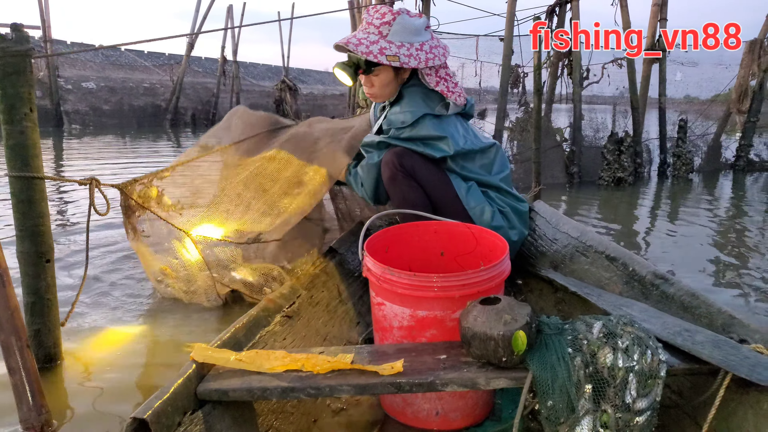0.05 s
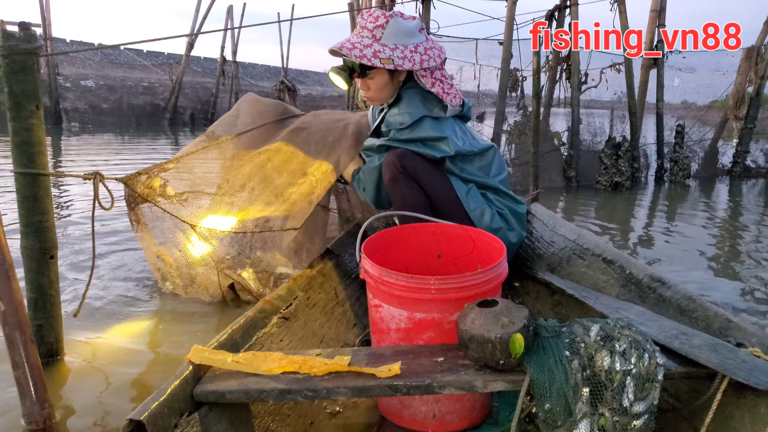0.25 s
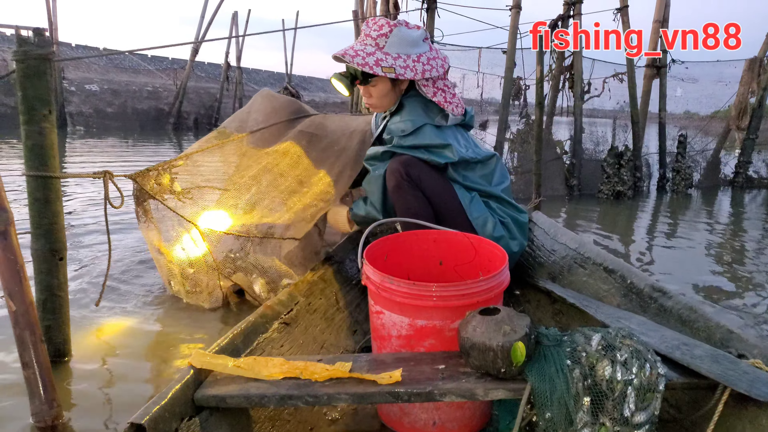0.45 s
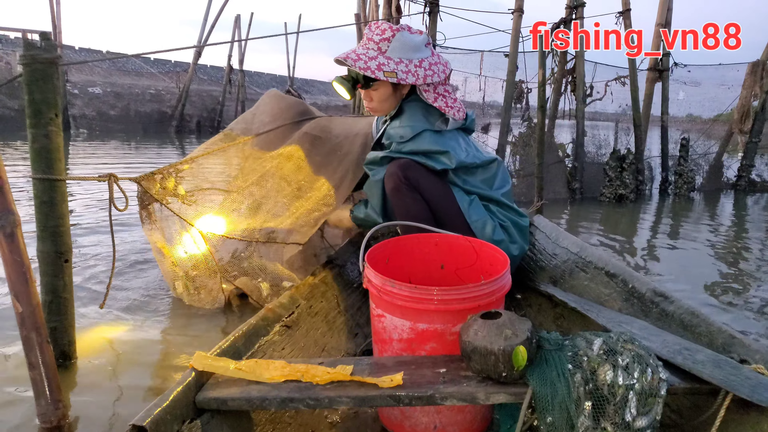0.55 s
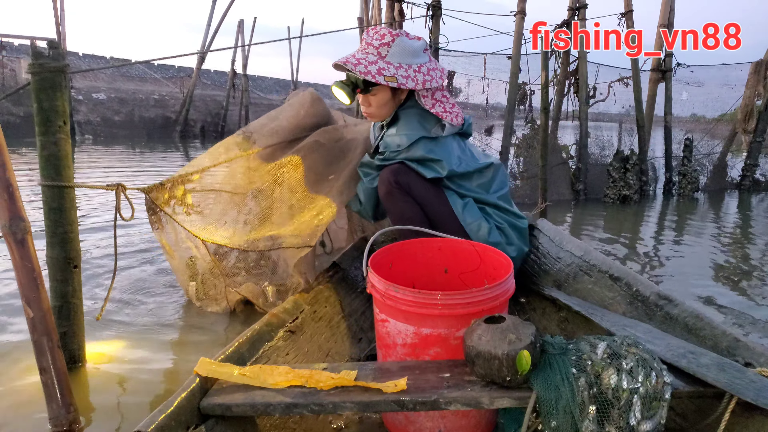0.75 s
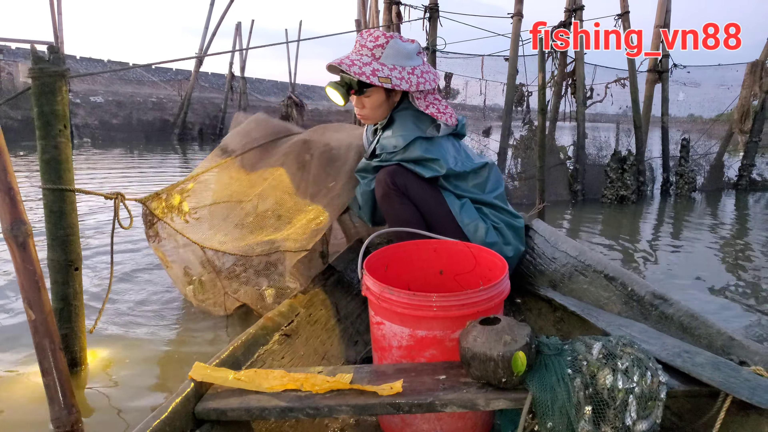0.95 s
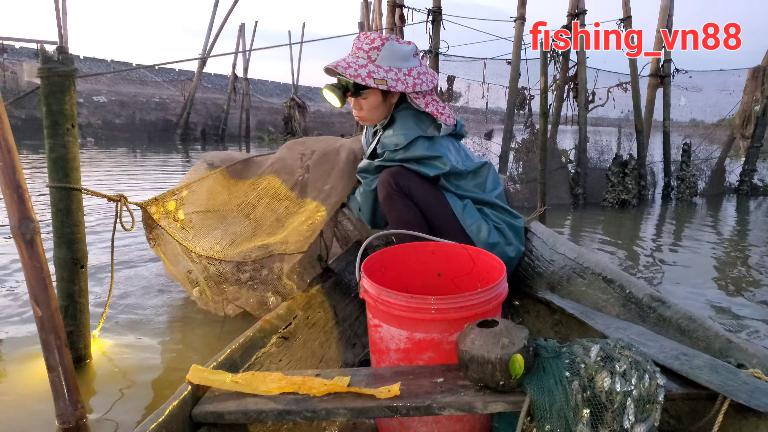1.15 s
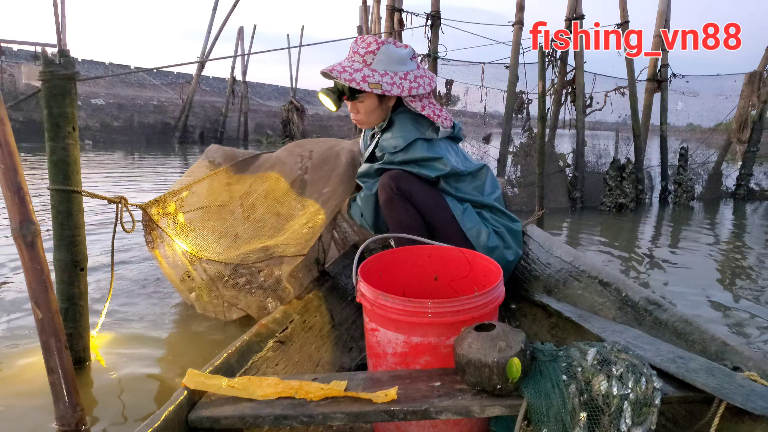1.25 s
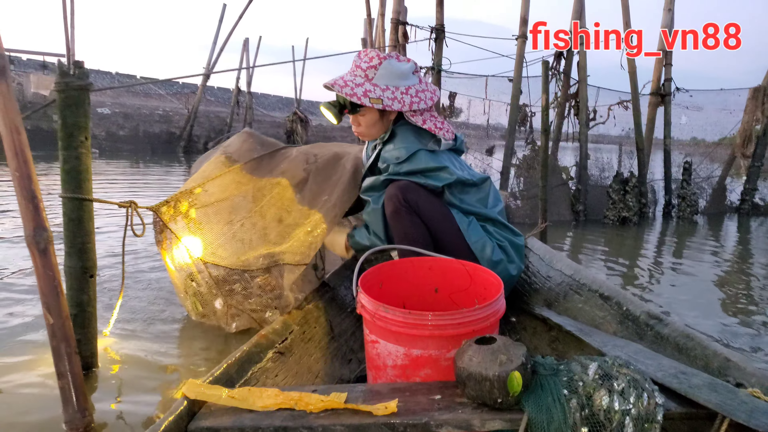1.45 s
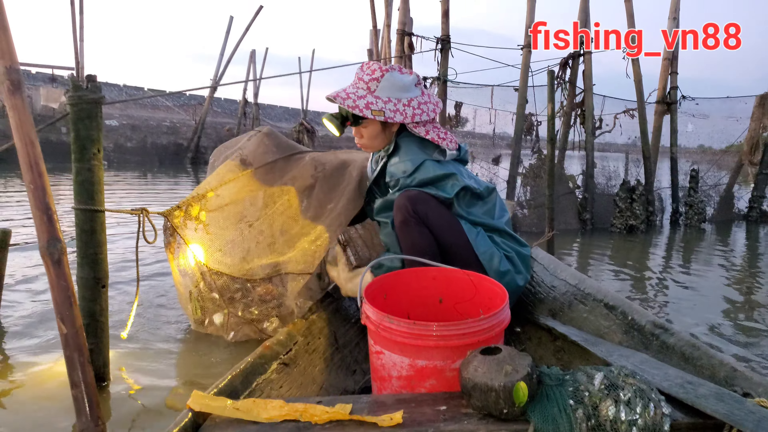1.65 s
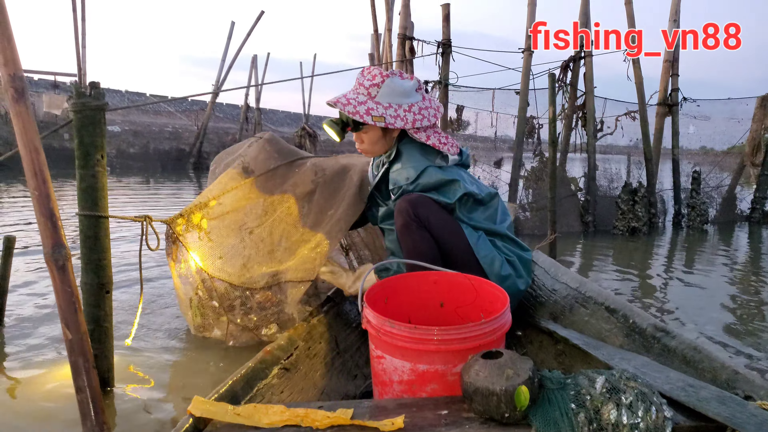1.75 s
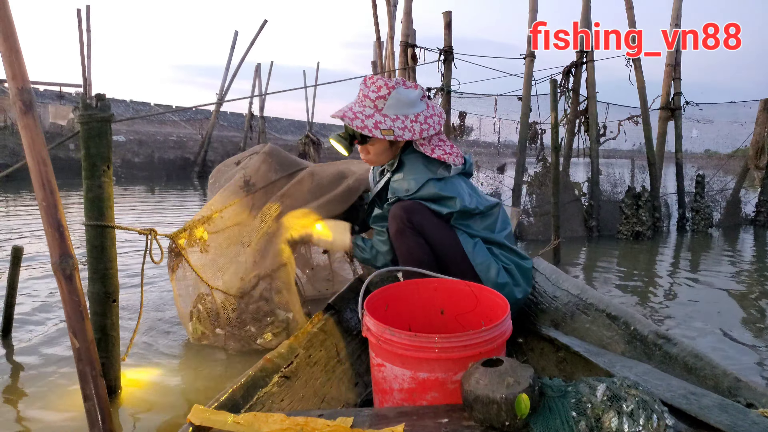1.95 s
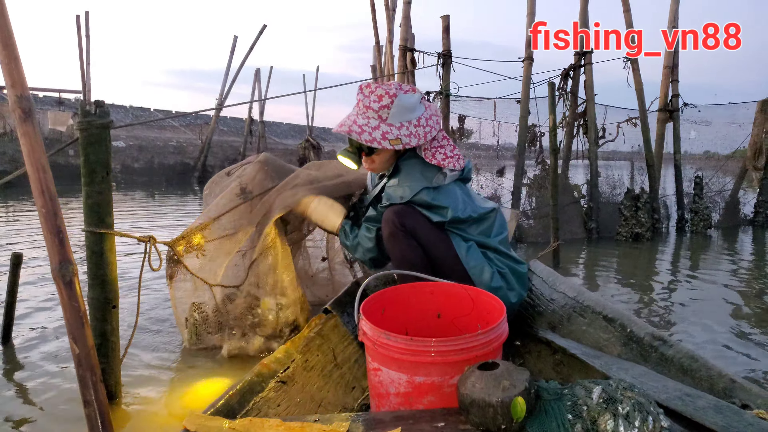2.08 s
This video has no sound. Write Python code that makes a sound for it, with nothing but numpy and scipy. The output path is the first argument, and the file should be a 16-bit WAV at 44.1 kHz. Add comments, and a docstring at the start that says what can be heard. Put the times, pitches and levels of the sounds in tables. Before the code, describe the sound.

Gushes of fine droplets drain off a hand-gathered net into a river, then two sharp slaps of water, with a low engine far behind.

```python
"""Water trickles and sprays from the mesh of a wet net, over the rumble of a far engine and the wash of a river.
The net is gathered by hand at the side of a wooden boat, and every pull wrings out a gush of tiny ringing drops.
Single drops patter down as noise bursts with a ring; trapped air rings as gliding sines.
Twice the water splashes up loudly: slaps of coloured noise with a cavity resonance, spray and falling droplets."""
import sys
import numpy as np
from scipy import signal
from scipy.fft import rfft, irfft
from scipy.io import wavfile

SR = 44100
rng = np.random.default_rng(int(sys.argv[2]) if len(sys.argv) > 2 else 0)


def master(y):
    """Save y as 16-bit WAV."""
    cut = np.clip(np.atleast_2d(y).T, -1, 1)
    pcm = np.round(cut * 32767)  # scale
    wavfile.write(sys.argv[1], SR, pcm.astype(np.int16))


N = 295029
TIME = np.arange(N) / SR  # s
FREQS = np.maximum(np.fft.rfftfreq(N, 1 / SR), 1)  # Hz


def from_db(db):
    """Amplitude ratio: 20 dB is a factor of ten in pressure."""
    return 10 ** (np.asarray(db) / 20)


def rms_one(x):
    """Power normalisation: scale to unit rms."""
    return x / np.sqrt(np.mean(x ** 2) + 1e-20)


def at_hz(points, hz):
    """Logarithmic pitch scale: interpolate a table between its frequencies."""
    table_hz, value = np.transpose(points)
    return np.interp(np.log(hz), np.log(table_hz), value)


def drift(rate_hz):
    """Low-passed chance: a slow random curve of unit rms."""
    knots = rng.standard_normal(int(N / SR * 400))
    low_pass = signal.butter(2, min(rate_hz, 90), fs=200, output="sos")
    slow = signal.sosfilt(low_pass, knots)[len(knots) // 2:]  # the settled half, 200 knots per second
    return np.interp(TIME, np.linspace(0, N / SR, len(slow)), rms_one(slow))


def noise(spectrum):
    """Spectral shaping: white noise weighted to a given colour, rms 1."""
    white = rfft(rng.standard_normal(N))
    return rms_one(irfft(white * from_db(at_hz(spectrum, FREQS)), N))


def resonate(x, hz, q):
    """Damped resonance: two poles whose radius sets the bandwidth hz / q, near unit gain on top."""
    radius = np.exp(-np.pi * hz / q / SR)
    zeros = np.array([1, 0, -1]) * (1 - radius * radius) / 2
    poles = [1, -2 * radius * np.cos(2 * np.pi * hz / SR), radius * radius]
    return signal.lfilter(zeros, poles, x + 1e-18)


def high_pass(x, hz):
    """High-pass filtering: second-order removal of what lies below a corner."""
    return signal.sosfilt(signal.butter(2, hz, "high", fs=SR, output="sos"), x)


def add(out, start_s, sound):
    """Superposition: mix a short sound in at a time."""
    i = int(np.clip(start_s * SR, 0, N - 1))
    out[i:i + len(sound)] += sound[:N - i]


def burst(t, swell_s, decay_s):
    """Attack and exponential decay: an envelope that climbs to 1 and dies away."""
    return np.minimum(t / swell_s, 1) * np.exp(-np.maximum(t - swell_s, 0) / decay_s)


def rush(shape):
    """Whitening: a noise burst under an envelope, evened over all frequencies; rms 1."""
    spectrum = rfft(rng.standard_normal(len(shape)) * shape)
    flat = irfft(spectrum / (np.abs(spectrum) + 1e-12), len(shape))
    return rms_one(flat * np.sqrt(shape))


def colour(spectrum):
    """Minimum phase: a causal response of given levels rings only after what excites it."""
    cepstrum = irfft(np.log(from_db(at_hz(spectrum, FREQS))), N)
    cepstrum[1:N // 2 + 1] *= 2  # fold negative time onto positive
    cepstrum[N // 2 + 1:] = 0
    return np.exp(rfft(cepstrum))


# each pull on the net wrings out a gush of water
# columns: crest_s, swell_s, ebb_s, trickle_db, fizz_db, spray_db
GUSHES = [(0.13, 0.34, 0.28, -53.5, -56, -58.5), (0.96, 0.35, 0.32, -57.5, -61, -59.5),
          (1.4, 0.21, 0.31, -62.5, -63.5, -61.5), (2.52, 0.26, 0.21, -54, -55.5, -62.5),
          (3.1, 0.3, 0.12, -58, -54.5, -59), (4.0, 0.21, 0.15, -50.5, -53, -58),
          (5.029, 0.121, 0.22, -55.5, -60, -65), (5.52, 0.066, 0.1, -44.5, -53, -52),
          (5.92, 0.16, 0.24, -56, -61.5, -61.5), (6.583, 0.21, 0.11, -49, -57, -59)]
# the mesh keeps draining between pulls: trickle_db, fizz_db, spray_db
SEEP_LEVELS_DB = (-60.5, -68.5, -69)


def flow():
    """Addition of powers: a steady seep plus a gush for each pull, as dB of trickle, fizz and spray."""
    power = from_db(SEEP_LEVELS_DB)[:, None] ** 2
    for crest_s, swell_s, ebb_s, *levels_db in GUSHES:
        width_s = np.where(TIME < crest_s, swell_s, ebb_s)
        gush = np.exp(-((TIME - crest_s) / width_s) ** 2)
        power = power + np.outer(from_db(levels_db), gush) ** 2
    return 10 * np.log10(power)


# colour of the running water within each register
# columns: pitch_hz, level_db (relative, per Hz)
TRICKLE_COLOUR = [(300, -22), (450, -32), (620, 9), (780, 3.5), (1050, 8.5), (1270, 3.5), (1480, -0.5),
                  (1750, 8), (2100, -15.5), (2500, -3.5), (3000, -5), (5000, -16), (7000, -14),
                  (10000, -24.5), (15000, -10.5)]


def trickle(per_s=420, size_db=4.0, q=6.9, clump_db=2.5, own_db=3.0, smooth_hz=2000, count=36):
    """Random impulses on resonators: countless drops ring a few cycles, the high ones most numerous."""
    clumps, registers = drift(20.7), np.zeros((3, N))
    for hz in np.geomspace(380, 15500, count):
        born = rng.random(N) < per_s * (hz / 1000) ** .75 / SR  # per_s holds at 1 kHz
        sizes = np.zeros(N)
        drop_db = size_db * np.minimum(rng.exponential(1, born.sum()), 4)
        sizes[born] = from_db(drop_db) * rng.choice([-1, 1], born.sum())
        patchy_db = own_db * min(1, smooth_hz / hz)  # the fine spray is the most even
        patches = from_db(clump_db * clumps + patchy_db * drift(4.9))
        rings = rms_one(resonate(sizes * patches, hz, q))
        # trickle, fizz and spray part at 2000 and 6500 Hz; sqrt(hz) allows for the widening bands
        register = np.searchsorted([2000, 6500], hz)
        registers[register] += rings * np.sqrt(hz) * from_db(at_hz(TRICKLE_COLOUR, hz))
    return sum(rms_one(r) * from_db(level_db) for r, level_db in zip(registers, flow()))


# colour of the engine's rumble
# columns: pitch_hz, level_db (relative, per Hz)
RUMBLE_COLOUR = [(20, -23), (32, -23), (45, -4), (66, -2), (90, -1), (120, -6), (160, -10), (215, -17),
                 (290, -15), (420, -29.5), (700, -38), (1500, -65)]
# engine orders
# columns: pitch_hz, level_db (rms, before the throb)
ENGINE_ORDERS = [(66, -56), (127.5, -63), (186, -64)]


def engine(rumble_db=-49.5, side_db=-16, waver_rad=0.86, throb_db=2.0):
    """Periodic orders in broadband noise: a distant engine's dull rumble, nearly alike left and right."""
    side = from_db(side_db) * noise(RUMBLE_COLOUR) * np.array([[1], [-1]])
    rumble = noise(RUMBLE_COLOUR) + side
    hum = np.zeros(N)
    for hz, level_db in ENGINE_ORDERS:
        level = from_db(level_db + throb_db * drift(5.3))
        phase = 2 * np.pi * hz * TIME + waver_rad * drift(2.6)
        hum += level * np.sqrt(2) * np.sin(phase)
    return from_db(rumble_db) * rumble + hum


# colour of the open water
# columns: pitch_hz, level_db (relative, per Hz)
RIVER_COLOUR = [(150, 2.5), (320, 13.5), (480, 2.5), (950, 6.5), (1400, -0.5), (1800, -2), (3000, -4),
                (6000, -11.5), (10000, -28), (15000, -34)]


def river(level_db=-61):
    """Incoherent field: independent noise left and right makes the soft, wide wash of open water."""
    return from_db(level_db) * np.array([noise(RIVER_COLOUR), noise(RIVER_COLOUR)])


SMALL_DROPS_PER_S = 22  # at the mean fizz level
SMALL_DROP_DB, SMALL_SMACK_DB, SMALL_SPATTER_DB = -60.5, -67, -65  # likewise
SMALL_DROP_HZ, SMALL_DROP_OCTAVES, SMALL_DROP_SPREAD_DB = 2960, 0.6, 2.5  # median, spreads
DROP_SIZE_FOLLOWS = 0.54  # share of the flow's swing in dB


def small_drops():
    """Flow-driven Poisson process: lesser drops, more and heavier in a gush; rows as in LARGE_DROPS."""
    swing_db = flow()[1]
    swing_db = swing_db - swing_db.mean()
    born = np.flatnonzero(rng.random(N) < SMALL_DROPS_PER_S * from_db(swing_db) / SR)
    pitch, size, spatter = rng.standard_normal((N, 3))[born].T
    weight_db = DROP_SIZE_FOLLOWS * swing_db[born] + SMALL_DROP_SPREAD_DB * size
    hz = np.clip(SMALL_DROP_HZ * 2 ** (SMALL_DROP_OCTAVES * pitch), 900, 7000)
    spatter_db = SMALL_SPATTER_DB + weight_db + SMALL_DROP_SPREAD_DB * spatter
    return list(zip(born / SR, hz, SMALL_DROP_DB + weight_db, SMALL_SMACK_DB + weight_db, spatter_db))


# the largest drops; levels are rms at the crest of the envelope
# columns: start_s, pitch_hz, ring_db, smack_db, spatter_db
LARGE_DROPS = [(.05, 4360, -44, -48, -55), (.054, 1620, -44, -52, -60), (.083, 2260, -49, -46, -58),
               (.089, 2780, -46, -48, -60), (0.107, 2910, -48, -51, -60), (.128, 1740, -54, -65, -60),
               (.185, 4710, -47, -43, -56), (0.1995, 4300, -38, -36.5, -51), (.209, 4150, -40, -50, -60),
               (.227, 2470, -48, -56, -62), (.272, 2390, -48, -41, -60), (0.282, 4100, -42, -42, -53),
               (.298, 1230, -50, -60, -46), (.304, 3660, -46, -57, -64), (0.388, 4050, -44, -63, -66),
               (.563, 4260, -52, -57, -38.5), (0.604, 4000, -65, -72, -57), (.626, 3970, -60, -61, -44.5),
               (.727, 2590, -41, -55, -62), (.755, 2140, -45, -51, -64), (.783, 4000, -44, -48, -62),
               (.837, 3640, -44.5, -58, -64), (.858, 3690, -53, -59, -64), (.873, 1740, -56, -69, -66),
               (.925, 1610, -42.5, -54, -62), (.933, 2170, -49, -62, -62), (.969, 1730, -45, -64, -64),
               (.975, 2160, -45, -60, -64), (0.996, 1230, -38.5, -43.5, -58), (1.018, 1970, -42, -48, -54),
               (1.054, 4670, -49, -56, -45), (1.088, 1680, -43, -59, -62), (1.125, 1990, -41, -54, -60),
               (1.457, 4860, -47, -46, -55), (1.492, 5120, -59, -43.5, -59), (1.502, 3080, -44, -46, -57),
               (1.739, 2420, -42.5, -53, -66), (1.743, 3924, -38.5, -71, -67),
               (1.946, 1970, -37.5, -50, -52), (1.952, 2390, -46, -54, -48), (2.001, 1450, -50, -66, -40.5),
               (2.157, 3030, -38.5, -53, -56), (2.164, 1790, -44, -59, -62), (2.213, 1844, -32, -58, -60),
               (2.23, 3120, -38, -58, -60), (2.31, 1930, -44, -48, -62), (2.336, 3590, -43, -38.5, -49),
               (2.343, 3590, -48, -44, -46), (2.36, 1725, -45, -61, -62), (2.386, 1650, -36, -60, -52),
               (2.398, 3280, -37, -44, -58), (2.404, 4110, -35, -36.5, -52), (2.434, 2754, -52, -45, -39),
               (2.449, 2510, -43, -43.5, -57), (2.481, 1940, -43, -59, -62), (2.507, 3010, -55, -42.5, -50),
               (2.558, 1320, -36, -54, -62), (2.569, 2170, -37, -61, -64), (2.586, 1930, -38, -62, -62),
               (2.63, 2670, -58, -72, -66), (2.671, 3650, -42, -41, -39), (2.679, 2460, -35, -41, -41),
               (2.71, 2520, -37, -47, -64), (2.722, 2970, -48, -62, -64), (2.744, 1670, -38.5, -60, -68),
               (2.772, 4480, -40.5, -42.5, -52), (2.81, 3100, -36, -52, -56),
               (2.817, 3170, -31.5, -54, -56), (2.858, 5280, -44, -52, -58), (2.888, 2460, -50, -41.5, -60),
               (2.925, 2486, -31.5, -39, -49), (2.94, 3480, -40, -38, -49), (2.956, 2550, -41, -44, -56),
               (2.974, 2490, -45, -46, -62), (2.987, 2550, -39, -44, -48), (3.017, 4200, -45, -32, -41),
               (3.029, 3620, -45, -50, -58), (3.046, 2500, -32.5, -40, -45), (3.075, 2560, -32.5, -37, -44),
               (3.089, 2480, -47, -38, -45), (3.103, 2510, -36, -36, -37), (3.115, 3100, -35, -40, -54),
               (3.144, 2520, -52, -42, -57), (3.154, 1460, -41, -45, -60), (3.598, 3480, -50, -43, -60),
               (3.696, 4900, -52, -52, -50), (3.845, 3040, -43, -52, -58), (3.852, 2450, -45, -45, -46),
               (3.87, 1640, -36.5, -40, -42), (3.89, 2386, -46, -47, -53), (3.907, 1280, -35, -42, -39),
               (3.917, 1370, -47, -57, -60), (3.922, 2750, -40, -56, -60), (3.944, 4040, -37.5, -42.5, -54),
               (3.967, 1700, -53, -63, -45), (4.012, 1700, -47, -60, -52), (4.037, 4900, -56, -58, -56),
               (4.059, 2460, -39, -48, -58), (4.126, 2400, -55, -54, -45), (4.254, 3450, -54, -53, -52),
               (4.541, 4700, -65, -54, -49), (4.6, 4200, -50, -54, -63), (4.643, 2340, -53, -46.5, -45),
               (4.689, 1690, -48, -68, -69), (4.903, 4800, -54, -48, -61), (4.997, 3200, -43, -46, -60),
               (5.008, 3060, -44, -58, -62), (5.023, 1780, -38.5, -45, -42), (5.173, 2930, -43.5, -52, -44),
               (5.209, 2890, -52, -54, -48), (5.359, 2246, -37, -49, -45), (5.724, 1630, -43, -50, -62),
               (5.736, 5530, -51, -46, -52), (5.821, 3790, -51, -52, -40), (5.844, 3700, -64, -65, -44),
               (5.92, 1220, -44, -50, -32.5), (6.227, 4070, -56, -47.5, -46), (6.287, 2860, -46, -50, -55),
               (6.376, 1370, -42, -53, -55), (6.43, 1156, -62, -60, -45), (6.469, 3800, -50, -56, -60),
               (6.501, 1090, -44, -57, -43), (6.59, 2680, -43, -59, -58), (6.62, 1230, -38, -54, -58)]


def drops(swell_s=.001, decay_s=0.0014, tail_db=-18, tail_s=0.024, ring_tail_db=-24, stretch_per_s=1.36,
          rough=0.7, smack_hz=3300, smack_q=1.0, spatter_hz=7000):
    """Impact excitation: a drop smacks on wet mesh or water, rings briefly and throws off fine spatter."""
    out, t = np.zeros(N), TIME[:SR // 16]
    since = t - 5 * swell_s  # s from the crest
    hit = np.exp(-np.abs(since) / np.where(since < 0, swell_s, decay_s))
    tail = (since > 0) * np.exp(-np.abs(since) / tail_s)
    shape = np.maximum(hit, from_db(tail_db) * tail)
    ring_shape = np.maximum(hit, from_db(ring_tail_db) * tail)
    strength = np.sqrt(np.mean(shape ** 2))
    for start_s, hz, ring_db, smack_db, spatter_db in LARGE_DROPS + small_drops():
        # each ring rises in pitch at a rate of its own
        phase = 2 * np.pi * hz * t * (1 + stretch_per_s * rng.random() * t)
        tone = rms_one(np.sin(phase) * ring_shape)
        ring = rms_one(tone + rough * rms_one(resonate(rush(shape), hz, 3.0)))
        smack = rms_one(resonate(rush(shape), smack_hz, smack_q))
        spatter = rms_one(high_pass(rush(shape), spatter_hz))
        drop = from_db(ring_db) * ring + from_db(smack_db) * smack + from_db(spatter_db) * spatter
        add(out, start_s + since[0] + swell_s, strength * drop)  # crest one swell after start_s
    return out


PLOPS_PER_S = 22  # at the mean trickle level
PLOP_DB, PLOP_SPREAD_DB = -4, 6  # peak re the trickle
PLOP_HZ, PLOP_OCTAVES = 1180, 0.69
PLOP_CYCLES, PLOP_GLIDE = 9.1, 0.11  # cycles in the 60 dB decay, scale of the random glide


def small_bubbles():
    """Flow-driven Poisson process: little plops, more often in a gush; rows as in AIR_POCKETS."""
    trickle_db = flow()[0]
    swing = from_db(trickle_db - trickle_db.mean())
    born = np.flatnonzero(rng.random(N) < PLOPS_PER_S * swing / SR)
    pitch, size, glide = rng.uniform(-1.07, 1, (N, 3))[born].T
    hz = PLOP_HZ * 2 ** (PLOP_OCTAVES * pitch)
    peak_db = trickle_db[born] + PLOP_DB + PLOP_SPREAD_DB * size
    return list(zip(born / SR, hz, peak_db, PLOP_CYCLES / hz, PLOP_GLIDE * (glide + .5)))


# air pockets ringing in the water
# columns: start_s, pitch_hz, peak_db, t60_s, glide (share of the pitch gained in one t60)
AIR_POCKETS = [(0.112, 1023, -38, 0.04, 0.05), (.222, 860, -53, 0.025, .1), (.314, 1000, -49, .025, .1),
               (.418, 1090, -54, 0.019, .1), (0.715, 1800, -42, 0.021, 0.17),
               (1.088, 1070, -41, 0.03, -0.08), (1.358, 950, -42.5, 0.027, 0.39),
               (1.552, 713, -46, 0.035, 0.15), (1.945, 960, -36.5, 0.024, 0.026),
               (2.2, 1093, -37, 0.031, 0.14), (2.533, 1003, -38, 0.022, 0.16),
               (2.585, 1033, -40.5, 0.052, 0.046), (2.677, 1200, -33, 0.013, .1),
               (3.978, 1640, -39, .03, 0.031), (3.983, 1000, -37, 0.028, 0.076),
               (4.004, 1100, -42, 0.027, .1), (4.1, 1130, -45, 0.022, 0.16), (4.149, 1140, -41, 0.019, .1),
               (4.071, 1016, -35.5, 0.049, -0.12), (4.137, 1105, -32, 0.03, 0.056),
               (5.367, 1496, -40, 0.038, 0.0038), (5.4805, 962, -23, 0.02, -0.043),
               (5.4875, 1080, -31, 0.022, -0.083), (5.496, 1010, -35, .02, 0.014),
               (5.5075, 1200, -36, .015, .05), (5.5246, 1190, -20.5, .011, .05),
               (5.5615, 1080, -24.5, 0.013, .1), (5.565, 728, -30, 0.029, 0.1),
               (5.6178, 1020, -24, .013, 0.12), (5.623, 683, -25.5, 0.031, 0.18),
               (5.6345, 870, -35, .018, .1), (5.665, 780, -29.5, 0.026, 0.14),
               (5.6775, 756, -25.5, 0.017, 0.1), (5.6905, 770, -27, 0.022, -0.076),
               (5.981, 1000, -26, 0.011, .05), (5.9872, 1120, -16, 0.017, 0.13),
               (5.998, 930, -31.5, 0.028, 0.073), (6.004, 1040, -35, 0.058, .1),
               (6.028, 964, -33, 0.034, 0.19), (6.036, 1410, -36, 0.023, .1),
               (6.208, 940, -37, 0.0096, 0.22), (6.23, 760, -39.5, .025, 0.046),
               (6.259, 1010, -33, 0.0076, 0.25), (6.33, 775, -40.5, 0.033, 0.012),
               (6.46, 1090, -45, 0.026, 0.12), (6.558, 1080, -37.5, .02, 0.074),
               (6.679, 1135, -28, 0.045, 0.17)]


def bubbles(pinch_s=0.00099):
    """Bubble resonance: pinched-off air rings, gliding as it nears the surface or is dragged down."""
    out, t = np.zeros(N), TIME[:SR // 10]
    for start_s, hz, peak_db, t60_s, glide in AIR_POCKETS + small_bubbles():
        phase = 2 * np.pi * hz * (t + glide * t * t / (2 * t60_s))
        envelope = burst(t, pinch_s, t60_s / np.log(1000))
        add(out, start_s, np.sin(phase) * from_db(peak_db) * envelope)
    return out


# thrown water falls back as droplets after every slap; level re the slap
FALLBACK_DB, FALLBACK_S, FALLBACK_PER_S = -13.5, 0.017, 600
# colour of the slap
# columns: pitch_hz, level_db (relative, per Hz)
SLAP_COLOUR = [(120, -8), (240, -1), (420, -9), (600, -11), (800, -3), (1000, 4.5), (1200, 4), (1450, -1.5),
               (1750, -0.5), (2100, -5.5), (2450, -4.5), (2900, -3.5), (4200, -19), (6500, -17),
               (10000, -30), (16000, -27)]
# slaps and sloshes of the water; cavity and spray re the slap, spray before its filter
# columns: start_s, level_db, swell_s, decay_s, cavity_hz, cavity_db, spray_db
SLAPS = [(.717, -54.5, 0.0035, 0.078, 1950, -3, -6), (1.106, -47, 0.006, 0.035, 1720, -2.5, -16),
         (2.136, -45, 0.022, 0.068, 2540, -0.5, -22), (2.195, -43, 0.011, 0.016, 1870, 0, -18),
         (4.07, -37.5, 0.003, 0.0015, 2410, 6.5, -13), (4.135, -42, 0.0016, 0.0056, 1100, 2.5, -11),
         (5.356, -41.5, 0.0037, 0.0033, 1560, 2, -14), (5.472, -26, 0.0072, 0.0072, 1700, -0.5, -11),
         (5.5, -40, 0.0035, 0.012, 4830, -6, -3), (5.523, -34.5, 0.0018, 0.0026, 1750, -3, -18),
         (5.5505, -40.5, 0.003, 0.0045, 2600, 4.5, -14), (5.558, -38, 0.0026, 0.0063, 2370, 0, -16),
         (5.6151, -26.5, 0.0021, 0.0043, 2480, -4, -9.5), (5.624, -36.5, 0.0042, 0.0054, 1790, -3, -19),
         (5.661, -35, 0.0015, 0.0038, 2880, 3, -10), (5.673, -41, 0.0024, 0.01, 3000, -6, -11),
         (5.689, -46, 0.0025, 0.0053, 1650, -11, -22), (5.98, -28, 0.0026, 0.0065, 3040, -2, -13),
         (5.997, -40.5, .003, 0.019, 4600, -6, -3)]


def splashes(q=5.1, spray_hz=6000):
    """Cavity resonance: a slap opens a ringing cavity, spray flies from its rim, and droplets fall back."""
    out, slaps, t = np.zeros(N), np.zeros(N), TIME[:SR // 6]
    for start_s, level_db, swell_s, decay_s, hz, cavity_db, spray_db in SLAPS:
        shape = burst(t, swell_s, decay_s)
        droplets = rms_one(rng.choice([-1, 1], len(t)) * (rng.random(len(t)) < FALLBACK_PER_S / SR))
        falling = burst(t, swell_s + FALLBACK_S / 2, FALLBACK_S)
        fallback = from_db(level_db + FALLBACK_DB) * droplets * falling
        strength = from_db(level_db) * np.sqrt(np.mean(shape ** 2))
        cavity = from_db(cavity_db) * strength * rms_one(resonate(rush(shape), hz, q))
        white = rng.standard_normal(len(t))
        flying = strength * rms_one(white * np.abs(white) * shape)  # the product makes it spiky
        spray = from_db(spray_db) * high_pass(flying + fallback, spray_hz)
        add(slaps, start_s, strength * rush(shape) + fallback)
        add(out, start_s, cavity + spray)
    body = colour(SLAP_COLOUR)
    body = body / np.sqrt(np.mean(np.abs(body) ** 2))
    return out + irfft(rfft(slaps) * body, N)


def hull(x, echo_s=0.0086, echo_db=-10):
    """Specular reflection: the planks inside the boat throw the water sound back once."""
    return x + from_db(echo_db) * np.interp(TIME - echo_s, TIME, x, left=0)


# left-right tilt of the water sound; the left channel takes +0.45 of it, the right -0.15
# columns: pitch_hz, tilt_db
CHANNEL_TILT = [(300, -1), (450, -20.5), (620, 9.5), (850, 2.5), (1150, 1), (1450, -7.5), (1800, 2),
                (2500, 7.5), (3200, -5), (5000, 2.5), (12000, 3)]
# share of the water's power that comes scattered off hull and ripples
# columns: pitch_hz, share (0-1)
SCATTERED_SHARE = [(200, 0.05), (500, 0.05), (1000, 0.2), (3000, 0.14), (5000, 0.87), (8000, 1), (12000, 1)]


def widen(x, late_s=0.0014465, late_turn_rad=2.13, early_s=0.00008, early_turn_rad=1.61, early_db=-7,
          wide_hz=430, scatter_s=0.003):
    """Stereo widening: above the bass the right channel gets two delayed, phase-turned copies, part diffused."""
    t = TIME[:SR // 20]
    share = np.clip(at_hz(SCATTERED_SHARE, FREQS), 0, 1)
    early = from_db(early_db) * np.exp(-1j * (2 * np.pi * FREQS * early_s + early_turn_rad))
    late = np.exp(-1j * (2 * np.pi * FREQS * late_s - late_turn_rad))
    right = np.where(FREQS > wide_hz, (early + late) / np.hypot(1, from_db(early_db)), 1)
    channels = []
    for tilt, copies in ((0.9, 1), (-0.3, right)):
        # the ripples move, so the scattered paths trade strength while their summed power holds
        echoes = rng.standard_normal(size=(8, len(t))) * np.exp(-t / scatter_s)
        weights = np.array([drift(51.6) for _ in echoes])
        weights /= np.linalg.norm(weights, axis=0)
        scattered = np.zeros(N)
        for weight, echo in zip(weights, echoes):
            scattered += weight * signal.oaconvolve(x, echo / np.linalg.norm(echo))[:N]
        both = np.sqrt(1 - share) * copies * rfft(x) + np.sqrt(share) * rfft(scattered)
        channels.append(irfft(both * from_db(tilt * at_hz(CHANNEL_TILT, FREQS) / 2), N))
    return np.array(channels)


def scene():
    """Superposition of sources: water close by, engine and river far off."""
    water = trickle() + drops() + bubbles() + splashes()
    return widen(hull(water)) + engine() + river()


def record(dry, cutoff_hz=15950):
    """Band limiting: an elliptic low-pass cuts the top steeply."""
    return signal.sosfilt(signal.ellip(10, .2, 70, cutoff_hz, fs=SR, output="sos"), dry)


dry = scene()
out = record(dry)
master(out)
```